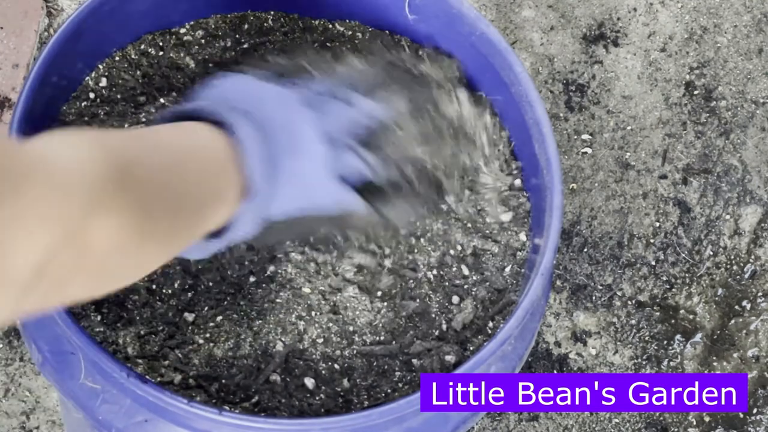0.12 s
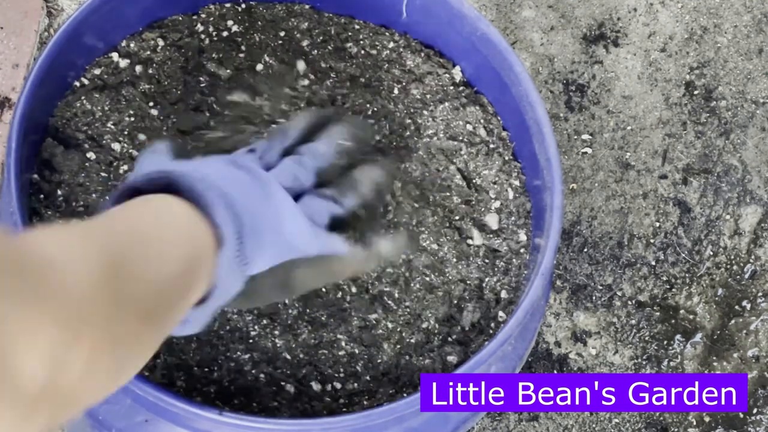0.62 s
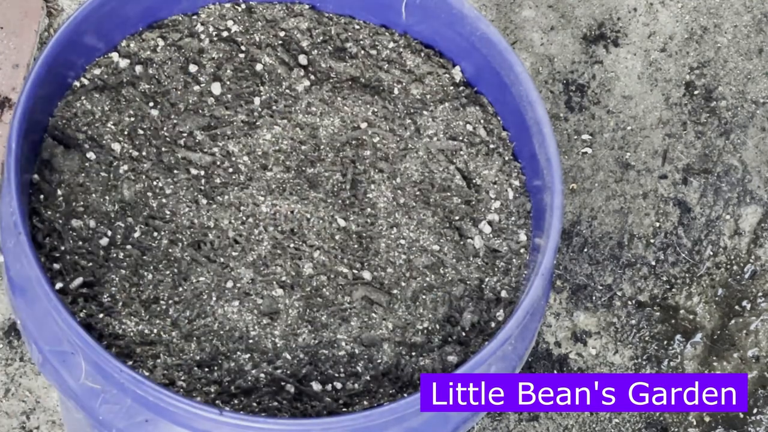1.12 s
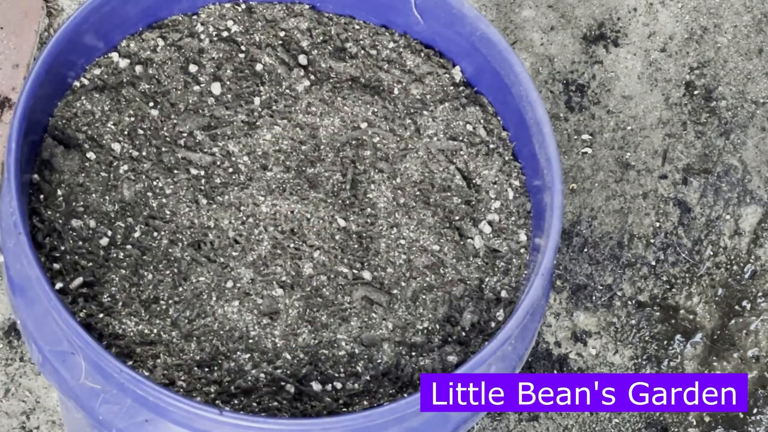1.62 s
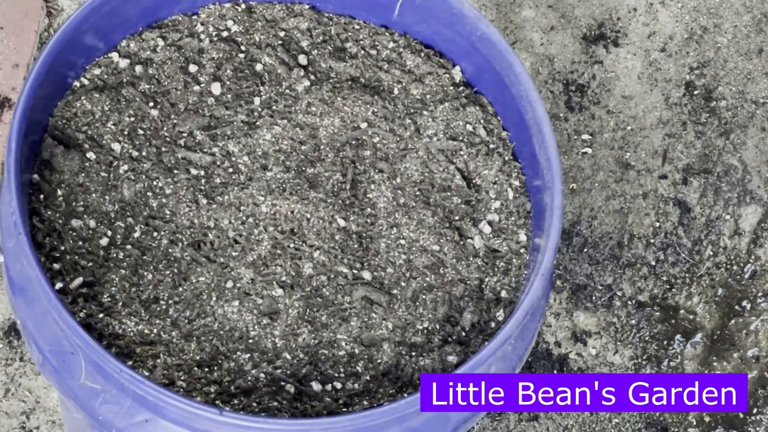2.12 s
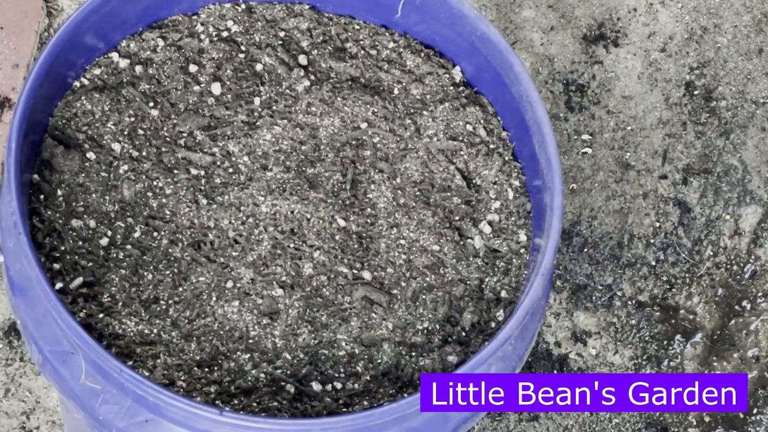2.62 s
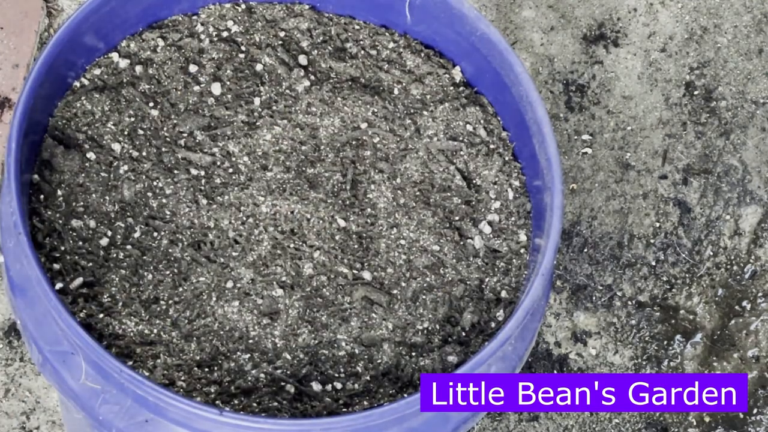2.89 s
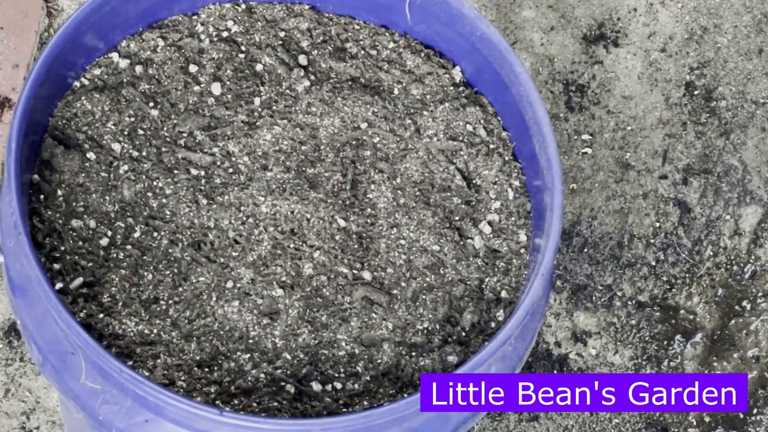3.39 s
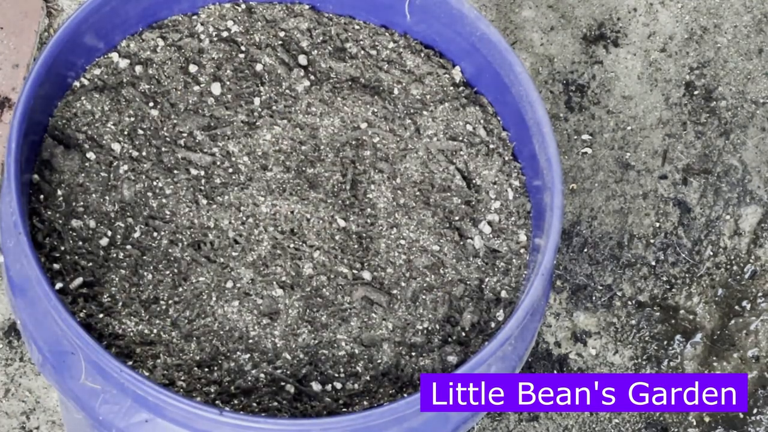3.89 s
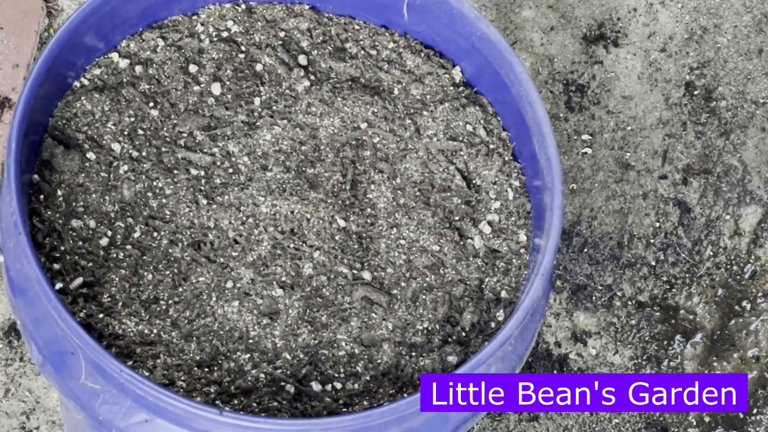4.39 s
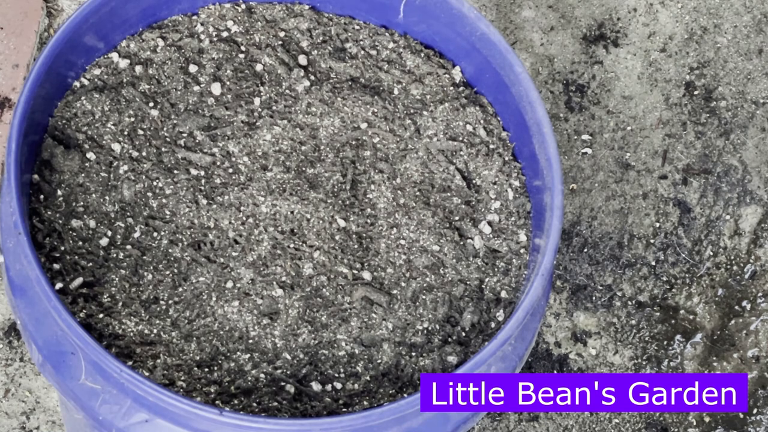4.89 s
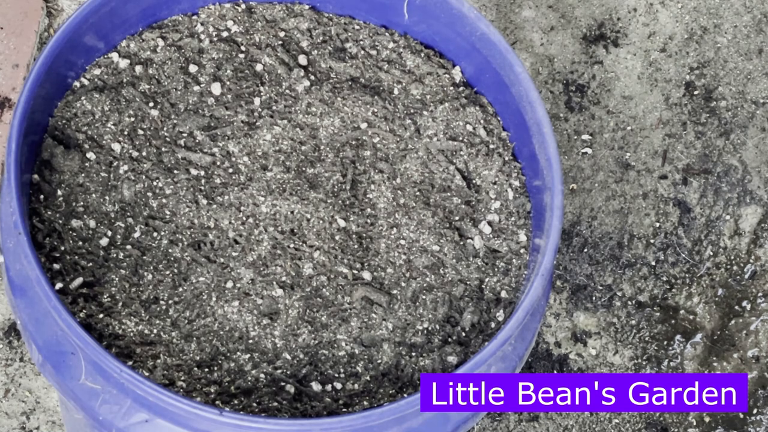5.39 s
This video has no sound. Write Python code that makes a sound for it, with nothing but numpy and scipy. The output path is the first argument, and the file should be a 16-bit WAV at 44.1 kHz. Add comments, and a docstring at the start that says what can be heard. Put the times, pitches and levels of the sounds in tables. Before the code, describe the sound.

Outdoors, close stereo microphones hear a gloved hand working dry, gritty soil in a plastic bucket. Soft brushing comes first, a crunchier burst follows after one second, then a quieter lull around three seconds, and a busy run of crumbly spills and taps on the wall around four. A low engine idles steadily some way off throughout.

```python
"""A gloved hand stirs potting soil in a plastic bucket outdoors while an engine idles some way off.
From the start, bands of granular noise make clods, crumbs and dust under the brushing glove; wavering
sines and shaped noise make the engine's orders, three exhaust puffs a cycle, rumble and roar.
After a quarter second clods and grit begin to tap the wall, ringing damped modes and spilling soil, and
the wire handle rings once. Two close microphone ports hear it all with a phase twist in the treble."""
import sys
import numpy as np
from scipy import signal
from scipy.fft import rfft, irfft, next_fast_len
from scipy.io import wavfile
from scipy.ndimage import uniform_filter1d, map_coordinates

SR = 44100
rng = np.random.default_rng(int(sys.argv[2]) if len(sys.argv) > 2 else 0)


def elevation(decibels):
    """Turn decibel levels (scalar or array-like) into linear amplitude ratios."""
    levels = np.asarray(decibels, float)
    return 10 ** (levels / 20)


def dump(signal):
    """Clip the signal to [-1, 1] and save it as 16-bit WAV at the path in sys.argv[1]."""
    limited = np.clip(np.atleast_2d(signal).T, -1, 1)
    pcm = np.round(limited * 32767).astype(np.int16)
    wavfile.write(sys.argv[1], SR, pcm)


N = 242550


def unit(x):
    """Normalization of power: x scaled to rms 1."""
    return x / np.sqrt(np.mean(x ** 2) + 1e-20)


def along(points, hz):
    """Logarithmic frequency scale: (Hz, value) points joined by straight lines on it."""
    f, v = np.transpose(points)
    return np.interp(np.log(hz + 1), np.log(f + 1), v)


def curve(points):
    """Linear interpolation: (s, value) points become one value per sample."""
    return np.interp(np.arange(N) / SR, *np.transpose(points))


def wobble(rate):
    """Band-limited fluctuation: a smooth curve through random knots, rate knots a second."""
    knots = rng.standard_normal(int(N * rate / SR) + 40)
    return map_coordinates(knots, [np.arange(N) * rate / SR])


def filtered(x, response):
    """Linear filtering: the spectrum of x times a complex response of frequency."""
    m = next_fast_len(N + SR // 2)
    return irfft(rfft(x, m) * response(np.fft.rfftfreq(m, 1 / SR)), m)[..., :N]


def grit(spectrum, spread_db, patchy_db):
    """Granular noise: two draws of dense grains of uneven size, with drifting patches of colour."""
    grain = 16  # samples
    sizes = rng.exponential(size=(2, N // grain + 1))
    sizes = np.minimum(uniform_filter1d(sizes, size=2), 3.2)
    grain_gain = elevation(spread_db * sizes.repeat(grain, axis=1)[:, :N])
    z = signal.stft(grain_gain * rng.standard_normal((2, N)), nperseg=256)[2]
    # smoothed over frequency, then over time
    patches = uniform_filter1d(rng.standard_normal(z.shape[1:]), size=5, axis=0)
    patches = uniform_filter1d(patches, size=6, axis=1)
    pair = signal.istft(z * elevation(patchy_db * unit(patches)), nperseg=256)[1][:, :N]
    return unit(filtered(pair, lambda hz: elevation(along(spectrum, hz))))


def tone(hz, db):
    """Frequency modulation: a sine whose phase sums its pitch curve, db being its rms level."""
    return np.sqrt(2) * elevation(db) * np.sin(2 * np.pi * np.cumsum(hz) / SR)


def brushing():
    """Frictional excitation: power of crumbs, clods and dust as each brush swells, then settles."""
    # brushes of the glove: start_s, length_s, crumbs_db, clods_over_crumbs_db, dust_over_crumbs_db
    strokes = [(0.0, .14, -71, 12.5, -3), (0.143, 0.17, -66.5, 10.5, -1), (.36, 0.1, -69.5, 10, -3.5),
               (0.679, 0.18, -77, 15, -5), (0.845, 0.077, -66.5, 7, -4), (0.925, .16, -79, 15.5, -3),
               (1.098, 0.11, -46.5, 1, -5.5), (1.24, 0.088, -45, -0.5, -4), (1.354, 0.11, -48, -1, -3),
               (1.514, 0.19, -55, 0.5, -3.5), (1.723, .21, -59, -3, -3), (1.937, 0.11, -62.5, 0.5, 0.5),
               (2.028, 0.1, -58.5, 1, -2.5), (2.118, 0.084, -63.5, 9, 0), (2.198, 0.21, -66.5, 3, -3),
               (2.35, .215, -68, 4, -5), (2.564, 0.042, -53, -3, -11), (2.708, 0.22, -78, 8, -2.5),
               (3.26, 0.3193, -81, -7, 3), (3.74, .07, -68.5, 0, 2.5), (3.803, 0.071, -61, -5, 0),
               (3.87, 0.082, -64.5, -1, 1.5), (3.967, 0.07, -64, 7, 5), (4.115, 0.031, -52.5, 2.5, -7),
               (4.201, 0.077, -56, 5, -7), (4.29, 0.088, -65, 6.5, 1.5), (4.37, .06, -68.5, 7, 4.5),
               (4.44, 0.162, -69.5, 0, 4.5), (4.615, .17, -70.5, 5.5, 0), (4.806, 0.082, -71, 9, 9),
               (4.895, 0.1, -69, 2, 8.5), (4.87, .04, -65.5, 2, -9), (5.03, .11, -78.5, 12, 0),
               (5.302, 0.1204, -81, 7, -1)]
    touch_s, settle_t60 = 0.0098, 0.13  # s for the glove to meet the soil, s for the soil to settle
    rise_share, rise_db = 0.52, 15  # part of a brush spent gathering speed, and its climb in level
    t = np.arange(N) / SR
    power = np.zeros((3, N))
    for s, length, db, clods_db, dust_db in strokes:
        climb = np.sin(np.pi / 2 * np.clip((t - s) / (rise_share * length), 0, 1))
        swell = np.clip((t - s) / touch_s, 0, 1) * elevation(rise_db * (climb - 1))
        shape = swell * elevation(-60 * np.maximum(t - s - length, 0) / settle_t60)
        power += (elevation(db + np.array([[0], [clods_db], [dust_db]])) * shape) ** 2
    return power


def spilling():
    """Exponential decay: power of crumbs, clods and dust knocked loose at once, then trickling away."""
    # spills of soil: start_s, crumbs_db, clods_over_crumbs_db, dust_over_crumbs_db, t60_s
    spills = [(0.257, -63, 10, 4.5, 0.45), (.517, -44.5, 2.5, -1, 0.059), (0.529, -59, 5, -5.5, .5),
              (1.102, -53, 6, -19, 0.27), (2.612, -56.5, 0, -7.5, .33), (3.579, -65, 1, -6, 1),
              (3.612, -52, 2.5, -17, 0.088), (3.715, -48, 1, -14, 0.19), (3.968, -55, -10, -10, 0.28),
              (4.029, -53, 3.5, -4.5, 0.57), (4.174, -46, 4, 0.5, .15), (4.181, -46, -2, -2.5, 0.19),
              (4.354, -58.5, 8, -4, 0.58), (4.605, -56.5, 2.5, 0, 0.3), (5.143, -54.5, 1, -6.5, 0.19),
              (5.2, -51.5, 1.5, 3, 0.26), (5.421, -63, 3, -4, .4)]
    t = np.arange(N) / SR
    power = np.zeros((3, N))
    for s, db, clods_db, dust_db, t60 in spills:
        shape = (t >= s) * elevation(-60 * np.maximum(t - s, 0) / t60)
        power += (elevation(db + np.array([[0], [clods_db], [dust_db]])) * shape) ** 2
    return power


def soil():
    """Incoherent addition: powers add to drive the thud of clods, crunch of crumbs and sift of dust."""
    # faint soil between the strokes: crumbs_db, clods_db, dust_db
    still_db = (-98, -66.5, -86)
    # spectrum of the clods: frequency_hz, relative_level_db
    clod_spectrum = [(100, -120), (200, -34.5), (400, -5), (900, -2.5), (1200, -0.5), (1550, -1.5),
                     (1900, -4.5), (2400, -9.5), (4000, -34.5), (9000, -120)]
    # spectrum of the crumbs: frequency_hz, relative_level_db
    crumb_spectrum = [(500, -120), (1200, -23), (2100, -8.5), (2700, 3), (3300, 0.5), (4500, -3),
                      (5500, -5.5), (7500, -8.5), (9500, -29), (13000, -26), (18000, -120)]
    # spectrum of the dust: frequency_hz, relative_level_db
    dust_spectrum = [(1500, -120), (3500, -26), (5500, -0.5), (7500, 3), (9500, 2.5), (11500, -1),
                     (12500, -2), (14000, 1), (15400, -5), (16200, -20)]
    still_power = elevation(np.array(still_db))[:, None] ** 2
    crumb_gain, clod_gain, dust_gain = np.sqrt(still_power + brushing() + spilling())
    bunches = wobble(70)  # crumbs break in bunches, and dust follows them
    clods = clod_gain * elevation(0.22 * wobble(40)) * grit(clod_spectrum, spread_db=1.5, patchy_db=-0.3)
    crumbs = crumb_gain * elevation(0.35 * bunches) * grit(crumb_spectrum, spread_db=1.0, patchy_db=1.6)
    dust = dust_gain * elevation(0.79 * bunches) * grit(dust_spectrum, spread_db=2.0, patchy_db=-2.8)
    return filtered(clods + crumbs + dust, lambda hz: hz < 15800)  # the rustle ends at a band limit


def engine_orders():
    """Harmonics of a periodic cycle: two strong low orders that waver, and weaker tones."""
    # level of the low throb, which swells and sags: time_s, level_db
    throb = [(0.0, -37.5), (0.15, -52), (0.2, -24), (0.24, -37), (0.52, -39.5), (2.6, -38), (3.15, -45.5),
             (3.2, -31), (3.52, -51), (3.55, -34), (4.06, -49), (4.14, -33.5), (4.44, -42), (4.98, -40.5),
             (5.01, -33), (5.39, -44.5), (5.42, -34.5), (5.5, -45)]
    # weaker engine tones: pitch_hz, level_db, waver_hz
    weak_tones = [(51.66, -47.5, 0.095), (71.1, -56, 0.34), (89.3, -53, 1.12), (103, -72.5, 5.6),
                  (122.05, -52.5, 3.17), (150.9, -54, 1.6), (358, -68, 8.3)]
    eighth_db = curve(throb) - 8.5 + 3.8 * wobble(5.1)
    eleventh_db = curve(throb) - 1 + 0.55 * wobble(10)
    orders = tone(42.9 + 0.4 * wobble(2.67), eighth_db)
    orders += tone(58.7 + 0.654 * wobble(2.368), eleventh_db)
    for hz, db, waver_hz in weak_tones:
        orders += tone(hz + waver_hz * wobble(4.5), db + 2.6 * wobble(3.9))
    return orders


def exhaust():
    """Periodic modulation: one note repeats its pitch and its three puffs in every engine cycle."""
    # exhaust note through one cycle: time_s, pitch_hz, relative_level_db
    note = [(0, 256, -43), (.02, 264, -38), (.035, 265.6, -50.5), (.055, 266, -41), (0.076, 267.4, -45),
            (.1, 266.7, -52), (0.126, 255, -43), (.145, 268, -47.5), (.172, 256.6, -63.5),
            (0.186, 245, -51)]
    cycle_hz, cycle_start_s = 5.336, 0.117
    s, hz, db = np.transpose(note)
    since = (np.arange(N) / SR - cycle_start_s) % (1 / cycle_hz)
    pitch_hz = np.interp(since, s, hz) + 3.45 * wobble(25)
    return tone(pitch_hz, np.interp(since, s, db) - 4.0 + 0.6 * wobble(22))


def engine():
    """Superposition: orders and exhaust alike at both ports, over broadband rumble and roar."""
    # spectrum of the deep rumble: frequency_hz, relative_level_db
    rumble_spectrum = [(12, -120), (20, -38), (26, -32), (33, -25.5), (40, 9), (65, 5.5), (100, -2.5),
                       (135, -1.5), (170, -9), (230, -10), (275, -9.5), (310, -20), (360, -33), (600, -120)]
    # spectrum of the broad roar: frequency_hz, relative_level_db
    roar_spectrum = [(180, -54), (300, -12), (356, -5), (393, -8.5), (594, -5), (647, -10), (790, -7),
                     (1500, -20), (2140, -28), (3370, -33.5), (9000, -58), (11700, -103), (19800, -120)]
    # slow course of the roar: time_s, level_db
    roar_level = [(0.0, -49.5), (0.53, -49.5), (0.81, -50.5), (1.19, -52.5), (2.02, -52.5), (2.14, -53),
                  (3.43, -53.5), (3.75, -51.5), (4.18, -49), (4.46, -54), (5.5, -53.5)]
    noise = filtered(rng.standard_normal((2, N)), lambda hz: elevation(along(rumble_spectrum, hz)))
    rumble = elevation(-39.5 + 0.81 * wobble(0.91)) * unit(noise)
    roar = elevation(curve(roar_level)) * grit(roar_spectrum, spread_db=-2.95, patchy_db=1.5)
    return (engine_orders() + exhaust()) * [[1], [0]] + rumble + roar


def taps():
    """Impact and modal response: a crack, wall modes nearest the contact pitch, a scatter of crumbs."""
    # taps on the bucket: time_s, level_db, contact_pitch_hz, relative_ring_db, relative_crack_db
    contacts = [(0.257, -34.5, 1750, -7, -40), (0.3966, -43, 8940, -20, -4), (0.5174, -34.5, 3440, -2, 7),
                (1.109, -34.5, 2396, -7, -39), (1.263, -46, 3306, 7, -36), (2.335, -56, 6990, -13, -10),
                (2.412, -50, 4000, -20, -10), (3.579, -45, 6150, -34, -3), (3.6118, -46, 1300, -22, -16),
                (3.7145, -32.5, 650, -15, -19), (3.7304, -46, 2900, -6, -14),
                (3.788, -36.5, 10930, -20, -4), (3.9024, -45, 7500, -16, -13),
                (3.9682, -35, 1000, -18, -26), (4.0298, -34, 2460, -22, -15), (4.0844, -39, 2900, -11, -25),
                (4.136, -50, 1485, -20, -18), (4.1718, -19.5, 5280, -37, 6.5),
                (4.2365, -41, 2490, -20, -14), (4.2535, -42, 3003, -20, -14),
                (4.2686, -33.5, 3000, -28, -25), (4.3536, -29.5, 2628, -25.5, -5),
                (4.4199, -38, 848, -17, -15), (4.607, -38.5, 5000, -31, -1), (4.6744, -40, 4530, -26, -16),
                (4.71, -48, 4505, -29, -14), (4.756, -51, 3510, -26, -14), (4.8773, -48.5, 2500, -12, -12),
                (5.144, -36, 2970, -13, -10), (5.2006, -29, 8140, -17, 5), (5.4201, -40.5, 1200, -22, -7)]
    # modes of the bucket wall: frequency_hz, relative_level_db, t60_s
    wall = [(500, -3, 0.069), (700, 13, 0.074), (928.2, 15, 0.036), (1370.5, 8, 0.028), (1588, 17, 0.024),
            (2064, 7, 0.032), (2315, 1.5, 0.069), (2900, -11, 0.071), (3400, 2.5, 0.015), (4460, -5, 0.036),
            (5670, 2, 0.018), (7500, -20, 0.022)]
    hard_rise_s, softens = 0.00014, 0.44  # rise at a 0 dB crack; a weaker crack means a slower contact
    scatter_t60, shortens = 0.036, 0.42  # s after a 1 kHz contact; power by which pitch shortens it
    mode_scatter_db = 2.5  # each tap rings each mode a little differently
    out, t = np.zeros((2, N + SR)), np.arange(SR // 8) / SR
    mode_hz, mode_db, mode_t60 = np.transpose(wall)[:, :, None]
    crack = elevation(-60 * t / 0.0025) * np.sin(2 * np.pi * 9000 * t)
    crack += 0.5 * elevation(-60 * t / 0.00037) * np.sin(2 * np.pi * 3000 * t)
    for s, db, hz, ring_db, crack_db in contacts:
        rise = hard_rise_s * elevation(-softens * crack_db)
        onset = 1 - np.exp(-t / max(rise, 1e-4))
        # modes weaken with the square of their distance in octaves from the contact pitch
        reach_db = -45 * np.log2(mode_hz / hz) ** 2
        reach_db = reach_db + mode_scatter_db * rng.standard_normal((len(wall), 1))
        mode_gain = elevation(ring_db + mode_db + reach_db - 60 * t / mode_t60)
        ring = (mode_gain * np.sin(2 * np.pi * mode_hz * t)).sum(0)
        edges = np.clip([hz * 0.5, hz * 2.02], 300, 16000)
        band = signal.butter(2, edges, "bandpass", fs=SR)
        scatter = unit(signal.lfilter(*band, rng.standard_normal((2, len(t)))))
        t60 = np.clip(scatter_t60 * (hz / 1e3) ** -shortens, 0.005, 0.2)
        tail = onset * elevation(-10 - 60 * t / t60) * scatter
        strike = (onset * ring + elevation(crack_db) * crack) * [[1], [0.4]]
        start = round(s * SR)
        out[:, start:start + len(t)] += elevation(db) * (strike + tail)
    return out[:, :N]


def handle():
    """Free vibration with damping: the wire handle rings once, one thin fading note."""
    # ring of the handle: start_s, pitch_hz, peak_db, t60_s
    wire = (.259, 1556, -52, .65)
    s, hz, db, t60 = wire
    t = np.maximum(np.arange(N) / SR - s, 0)
    fade = elevation(db - 60 * t / t60 + 1.7 * wobble(29.1))
    return fade * np.sin(2 * np.pi * hz * t) * [[1], [0.3]]


def scene():
    """Superposition: row 0 is what both ports share, row 1 what differs between them."""
    return soil() + engine() + taps() + handle()


def top_cut(x):
    """Nothing passes above the cut-off."""
    return signal.sosfilt(signal.butter(12, 16510, fs=SR, output="sos"), x)


def record(dry):
    """Interaural-style coherence: two ports differ in likeness, level and phase by frequency."""
    # likeness of the two ports: frequency_hz, left_right_likeness
    alike = [(60, 1), (170, 0.9), (300, 0.4), (450, 0.45), (750, 0.041), (1200, 0.13), (1600, 0.96),
             (2200, 0.99), (3500, 0.9), (5700, .8), (7000, 0.68), (8800, 1), (11500, 0.55), (13200, 1)]
    # level difference of the ports: frequency_hz, left_over_right_db
    lean = [(60, -0.9), (300, -2), (700, -0.76), (1400, 1.5), (2400, 0.1), (15000, -0.21)]
    # phase difference of the ports: frequency_hz, left_lead_radians
    twist = [(0, 0), (300, -.4), (500, .3), (2200, .05), (3100, .6), (5200, .55), (5700, -1.2),
             (6200, -1.25), (6750, -.8), (7750, -2.2), (8800, -3.14), (10850, -4.45), (12400, -5.75),
             (13200, -6.2), (14000, -6.283), (16500, -6.283)]

    def share(hz):
        angle = np.arccos(np.clip(along(alike, hz), 0, 1)) / 2
        return np.array([np.cos(angle), np.sin(angle)])

    def opposed(hz):  # each port takes half of the level and phase difference
        half = elevation(along(lean, hz) / 2) * np.exp(0.5j * np.interp(hz, *np.transpose(twist)))
        return np.array([half, 1 / half])

    mid, side = filtered(dry, share)
    ports = filtered(np.array([mid + side, mid - side]), opposed)
    return top_cut(ports)


dry = scene()
out = record(dry)
dump(out)
```